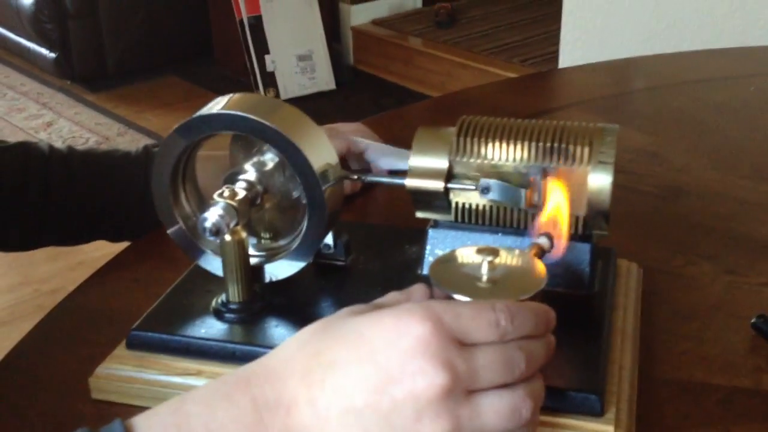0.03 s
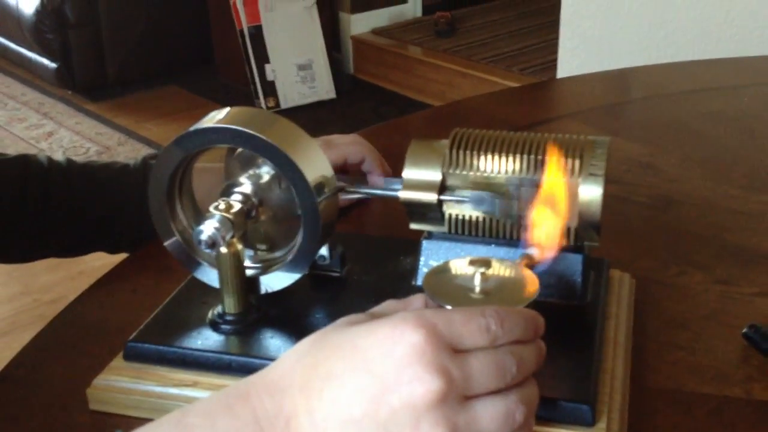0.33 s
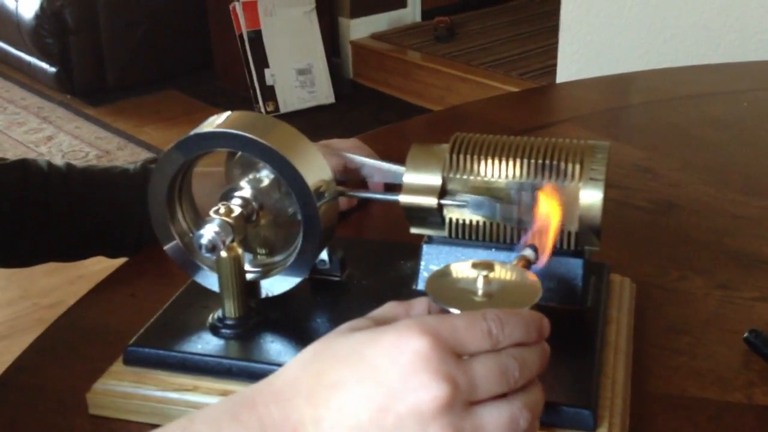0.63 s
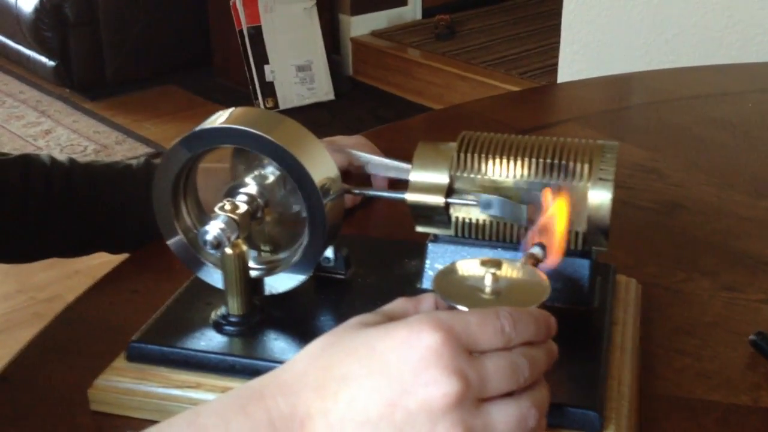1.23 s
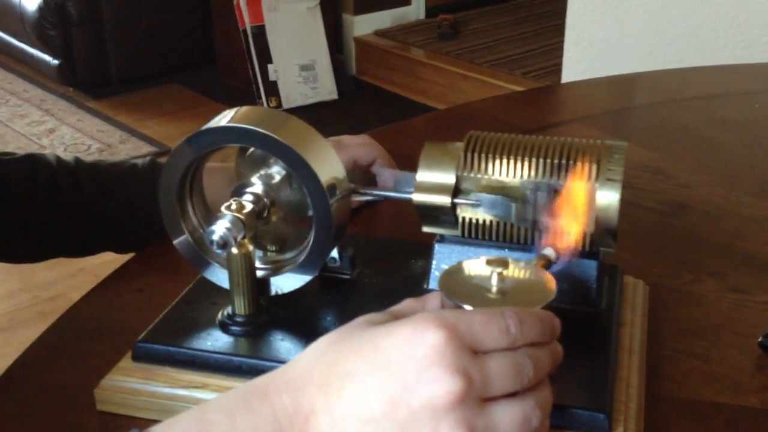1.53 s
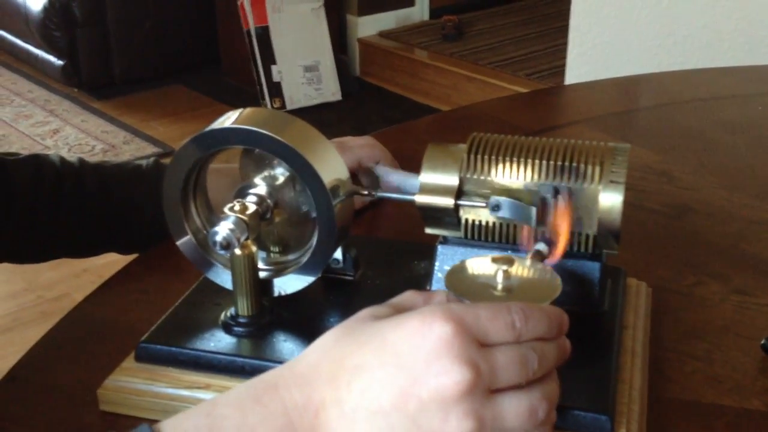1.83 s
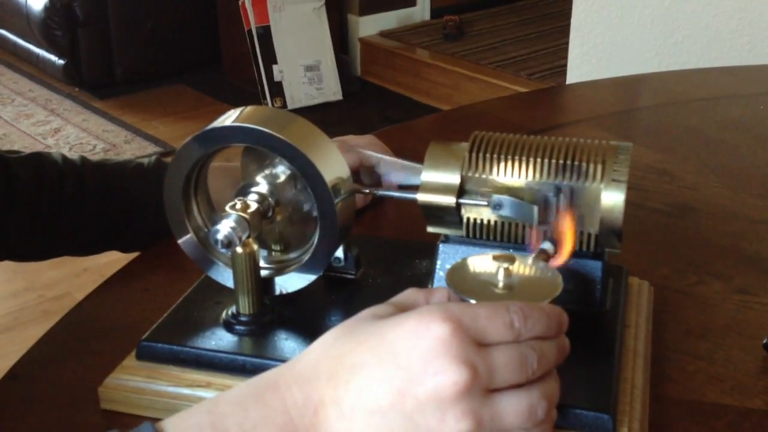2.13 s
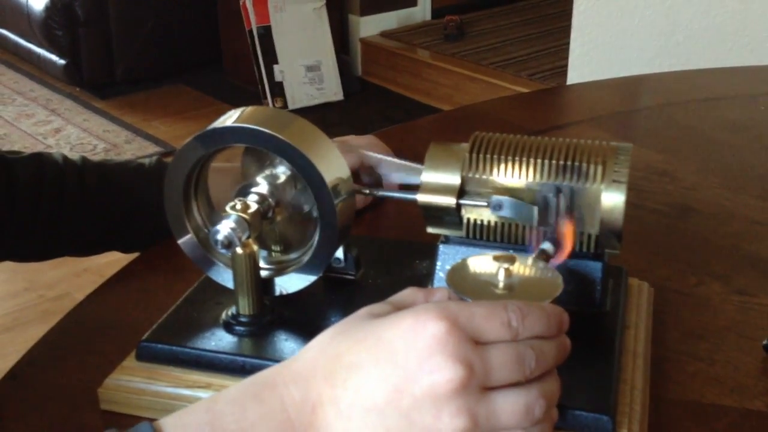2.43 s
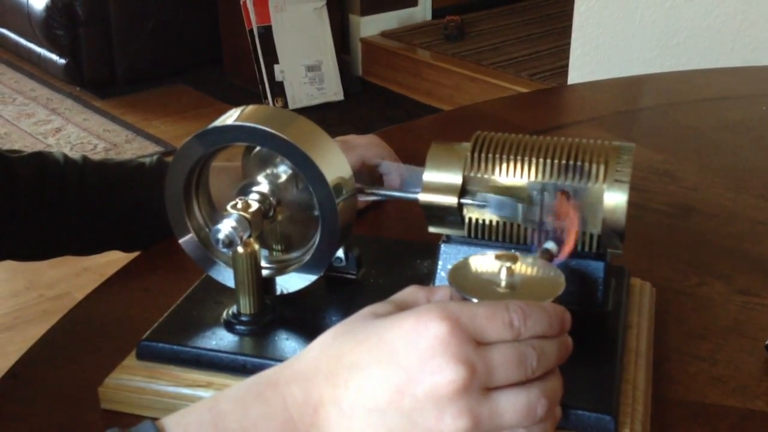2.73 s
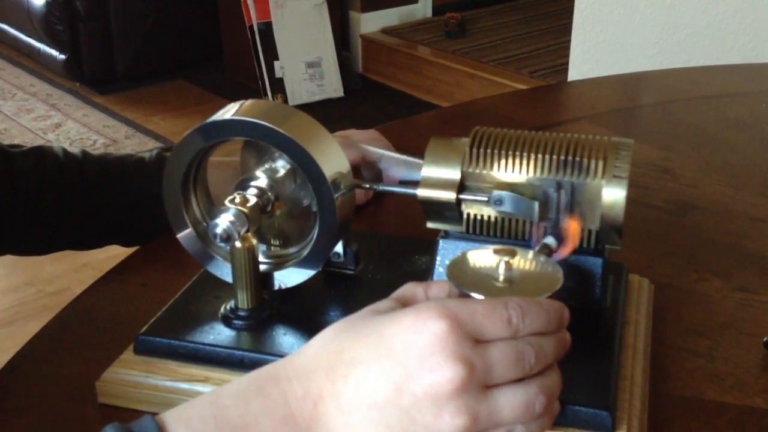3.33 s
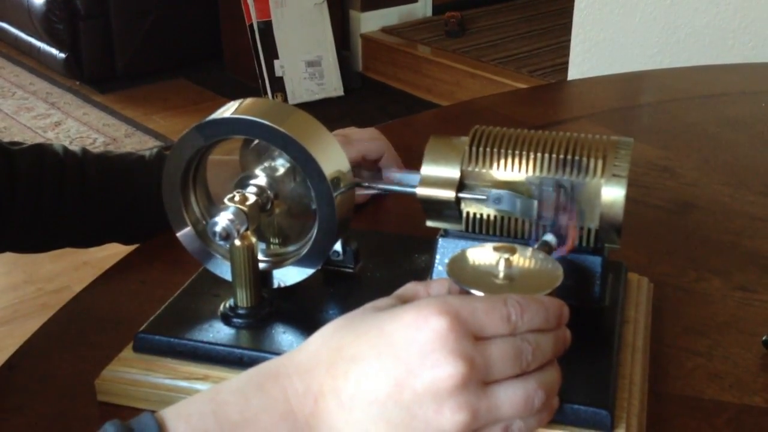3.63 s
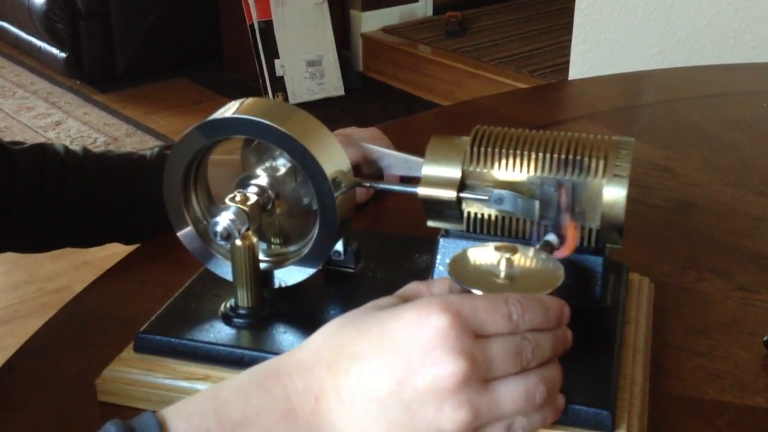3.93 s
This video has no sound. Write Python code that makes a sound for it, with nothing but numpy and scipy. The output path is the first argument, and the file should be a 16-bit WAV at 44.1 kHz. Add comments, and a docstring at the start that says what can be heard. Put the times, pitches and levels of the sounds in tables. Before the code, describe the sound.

A little flame-driven engine runs with quick popping clacks and faint ticks, gaining speed.

```python
"""Indoors, on a wooden table, a small flame-licker engine runs and picks up speed.
Once a turn its valve opens on the vacuum in the cylinder: air pops in with a puff of hiss, and the
cavity rings, rising in pitch as the port widens. Between the pops the loose linkage ticks and the
piston slides. The table and the room answer with echoes, low resonances and a short reverberation."""
import sys
import numpy as np
from scipy import signal
from scipy.fft import rfft, irfft
from scipy.io import wavfile
from scipy.ndimage import uniform_filter1d

SR = 44100
rng = np.random.default_rng(int(sys.argv[2]) if len(sys.argv) > 2 else 0)


def int16_out(signal):
    """Quantize to a 16-bit WAV file."""
    q = np.round(np.clip(np.atleast_2d(signal).T, -1, 1) * 32767)
    wavfile.write(sys.argv[1], SR, q.astype(np.int16))


N = 176400

# Reflections from near surfaces. Each row: delay in seconds, gain.
REFLECTIONS = [(.0036, 0.2), (.00735, 0.2), (.00812, -0.18), (.0093, -0.083), (.01073, .23),
               (.01379, 0.098), (0.0173, -0.053), (0.0203, -0.019), (.022, 0.059), (.0266, -0.053)]
# Modes of table and room. Each row: frequency in Hz, bandwidth in Hz, gain in dB.
LOW_MODES = [(139, 2.3, -1), (164.3, 7.7, 5), (288.2, 9.7, -3.5), (361.4, 5.7, -4.5), (439.7, 5.5, -6),
             (557.3, 11.7, -2.5), (666, 9.1, -36), (846, 10.4, -2.5), (920, 6, -29), (1110, 20, -19),
             (1163, 22, -12)]
# Spectrum of the diffuse field. Each row: frequency in Hz, gain in dB.
REVERB_SPECTRUM = [(100, 2.5), (250, -12.5), (420, -8.5), (600, -8.5), (740, -10), (1000, -16),
                   (1400, -10.5), (2200, -7), (4000, -17.5), (5500, -9.5), (8000, -6.5), (15000, -6.5)]
# Reverberation time. Each row: frequency in Hz, seconds to fall 60 dB.
REVERB_T60 = [(150, 0.34), (1500, 0.46), (6000, 0.27), (15000, 0.17)]
# Friction of the piston. Each row: frequency in Hz, relative level in dB.
PISTON_SPECTRUM = [(30, -22), (70, -20), (110, -23), (160, -10), (300, -6), (500, -9), (900, -10.5),
                   (1400, -7), (2000, -6), (2550, -7.5), (2800, -12), (4300, -17.5), (5100, -25.5),
                   (6300, -31.5), (7300, -22), (10000, -31), (14000, -25.5), (15500, -55)]
# Rub of the loose bearing. Each row: frequency in Hz, relative level in dB.
BEARING_SPECTRUM = [(100, -28), (300, -14), (900, -15), (1450, 0.5), (2000, -6.5), (2250, -0.5), (2550, 3),
                    (2800, -9.5), (3150, -0.5), (4300, -13.5), (5200, -29.5), (7300, -23), (8800, -20),
                    (15000, -32.5)]
# Contacts within a turn. Each row: part, position as a share of the turn, lag in seconds,
# level in dB when slow, level in dB when fast, scrape decay time in seconds.
TURN_CONTACTS = [ ("valve", -.044, 0, -33.5, -28, 0.0036), ("rod", 0, -.0003, -28.5, -26, 0.00022),
                 ("valve", 0.016, 0, -44, -33, 0.0012), ("rod", .30, .0042, -21.5, -25, .0001),
                 ("rod", .30, .0062, -34, -30, .0002), ("bearing", .465, 0, -41, -26.5, 0.0062),
                 ("valve", .515, 0, -30, -33, .0015), ("bearing", .565, 0, -42, -29.5, 0.0056),
                 ("bearing", 0.098, 0, -44.5, -27.5, 0.005)]
# Modes of each metal part. Each row: frequency in Hz, relative level in dB, seconds to fall 60 dB.
PART_MODES = { "rod": [(1915, -7, 0.013), (2510, -7, 0.021), (3216, -2, 0.011), (3755, -1.5, 0.0089),
              (4166, -1.5, 0.0097), (4310, -8.5, 0.007), (7270, -14, 0.0089), (7400, -37, 0.0078)],
              "valve": [(7110, -8.5, 0.018), (7800, -27, 0.0074), (8960, -15, 0.024), (13200, -10, 0.0067),
              (13720, -1.5, 0.0092), (14100, -1, 0.01)]}
# Pitch scatter from tap to tap. Each entry: part, standard deviation as a share of the pitch.
PART_DETUNE = {"rod": 0.024, "valve": 0.026}
# Flywheel turns. Each row: start in seconds, then relative levels in dB of the pop,
# the first cavity ring, the open-port whistle and the hiss.
TURNS = [(0.0007, -20.5, -24.5, -27, -38), (0.1189, -18, -22, -29, -41.5),
         (0.2395, -17, -21.5, -19.5, -38.5), (0.3622, -16, -23.5, -22, -38.5),
         (0.4859, -15.5, -24.5, -20, -35.5), (0.6125, -13.5, -25, -18.5, -31),
         (0.7406, -11, -12, -22.5, -31), (0.8652, -11.5, -12, -21.5, -33.5), (0.9886, -11.0, -10, -21, -32),
         (1.1077, -11.5, -13.5, -27, -34), (1.2262, -10.5, -9, -25, -32), (1.3416, -11, -11, -27, -32),
         (1.4545, -11, -10.5, -18.5, -30.5), (1.5658, -10.5, -13, -24, -31),
         (1.6754, -12, -15.5, -30, -29.6), (1.7844, -11, -13, -23.5, -34),
         (1.891, -10.5, -13.5, -28, -33.5), (1.9955, -12.0, -9.5, -27, -34),
         (2.0973, -10.5, -10, -35, -35.5), (2.1974, -11.9, -13, -30, -36), (2.296, -12, -14, -34, -32.5),
         (2.3935, -11.5, -13.5, -32, -31.5), (2.4897, -11.5, -13.5, -30, -34.3),
         (2.585, -13, -15.5, -25.8, -34.5), (2.679, -13.5, -23, -18.5, -34),
         (2.7725, -11.5, -17.8, -22.5, -33), (2.8646, -13, -16.5, -24, -30.5),
         (2.9567, -12.5, -16, -27, -34.6), (3.047, -13.5, -21.5, -21.5, -32.5),
         (3.137, -11.6, -17, -36, -31.5), (3.2257, -11, -15, -39, -31), (3.3139, -12, -17, -24, -32),
         (3.4013, -11.5, -14, -30, -31.5), (3.4869, -11.5, -17, -17.5, -30.5),
         (3.573, -12, -19.9, -19, -33.5), (3.6575, -12, -18, -17.5, -33.5), (3.7413, -12, -18, -17, -35.5),
         (3.8241, -12, -19, -20, -31), (3.9068, -11.5, -15.5, -15, -32.3), (3.988, -10.9, -20, -17, -35)]
# Cavity pitch as the port opens and shuts. Each row: share of the turn, frequency in Hz.
CAVITY_GLIDE = [(0, 1251), (.016, 1378), (.028, 1902), (.055, 1938), (.08, 1600)]
# Air rushing through the port. Each row: frequency in Hz, relative level in dB.
HISS_SPECTRUM = [(1500, -11), (2000, -1), (2400, 7.5), (2800, -1.5), (3700, -0.5), (5200, -14), (6300, -18),
                 (7400, -2.5), (8500, -9.5), (10000, -15), (12600, -9.5), (14200, -7.5), (15500, -18)]
# The valve leaks once, just before opening. Each row: time in seconds, relative level in dB.
VALVE_LEAKS = [(0.3611, -24)]
# Modes of the cylinder. Each row: frequency in Hz, bandwidth in Hz, gain in dB.
CYLINDER_MODES = [(1838, 40, -13.5), (2030, 47, -13), (2390, 64, -5.5)]

SLOW_HZ, FAST_HZ = 7.36, 11.83  # turning rates at pace 0 and pace 1
CONTACT_RISE_S, SUCTION_S = 0.00035, 0.00029


def amp(db):
    """Amplitude grows tenfold for every 20 dB."""
    return 10 ** (np.asarray(db) / 20)


def unit(x):
    """Normalisation brings a signal to rms 1."""
    return x / np.sqrt(np.mean(x ** 2) + 1e-20)


def read(points, hz):
    """Interpolation reads a table along a log-frequency axis."""
    f, value = np.transpose(points)
    return np.interp(np.log(hz + 1), np.log(f + 1), value)


def add(mix, start_s, sound):
    """Superposition: a sound adds to the mix from its start time on."""
    at = round(start_s * SR)
    sound = sound[max(-at, 0):]
    part = mix[max(at, 0):][:len(sound)]
    part += sound[:len(part)]


def noise(spectrum, size):
    """Filtering gives white noise a spectrum, here at rms 1."""
    gain = amp(read(spectrum, np.fft.rfftfreq(size, 1 / SR)))
    return unit(irfft(rfft(rng.standard_normal(size)) * gain, size))


def burst(spectrum, rise_s, fall_s):
    """A noise transient rises linearly and decays exponentially."""
    t = np.arange(2048) / SR
    envelope = np.minimum(t / rise_s, 1) * np.exp(-np.maximum(t - rise_s, 0) / fall_s)
    return noise(spectrum, len(t)) * envelope


def resonate(x, hz, width_hz):
    """A resonator passes a band around its natural frequency, with peak gain 1."""
    return signal.lfilter(*signal.iirpeak(hz, hz / width_hz, fs=SR), x)


def flywheel():
    """Rate is the inverse of period: gives each turn's start, period and pace (0 slow, 1 fast)."""
    starts = np.array(TURNS)[:, 0]
    periods = np.append(np.diff(starts), starts[-1] - starts[-2])
    return starts, periods, (1 / periods - SLOW_HZ) / (FAST_HZ - SLOW_HZ)


def room(x, echo_cutoff_hz=2040, mode_lag_s=0.01037, onset_s=0.0067):
    """Reflection and resonance: near echoes, low modes of table and room, and a diffuse tail."""
    out = np.zeros(N)
    dull = signal.lfilter(*signal.butter(1, echo_cutoff_hz, fs=SR), x)
    for delay, gain in REFLECTIONS:
        add(out, delay, gain * dull)
    for hz, width, db in LOW_MODES:
        add(out, mode_lag_s, amp(db) * resonate(x, hz, width))
    hz, t, bands = signal.stft(rng.standard_normal(SR // 2), SR, nperseg=256)
    decay = amp(-60 * t / read(REVERB_T60, hz)[:, None]) * np.minimum(t / onset_s, 1) ** 2
    decay /= np.sqrt(np.mean(decay ** 2, axis=1, keepdims=True) * SR / 2)  # equal energy per band
    tail = signal.istft(bands * decay * amp(read(REVERB_SPECTRUM, hz))[:, None], SR)[1]
    return out + signal.fftconvolve(x, tail)[:N]


def piston(slow_db=-46, fast_db=-37.5, stroke_db=1.5, peak_turn=0.36):
    """Sliding friction makes noise that swells once a turn and grows with speed."""
    starts, _, paces = flywheel()
    t = np.arange(N) / SR
    crank_turns = np.interp(t, starts, np.arange(len(starts)))
    level_db = slow_db + (fast_db - slow_db) * np.interp(t, starts, paces)
    level_db += stroke_db * np.cos(2 * np.pi * (crank_turns - peak_turn))
    return noise(PISTON_SPECTRUM, N) * amp(level_db)


def clink(modes, detune, scrape_s, scrape_gain=0.13):
    """An impulse with a short scrape excites the damped modes of a metal part."""
    t = np.arange(2048) / SR
    force = (t == 0) + scrape_gain * rng.standard_normal(len(t)) * np.exp(-t / scrape_s)
    pitch = 1 + detune * rng.standard_normal()
    ring = sum(amp(db - 60 * t / t60) * np.sin(2 * np.pi * hz * pitch * t) for hz, db, t60 in modes)
    ring *= 1 - np.exp(-t / CONTACT_RISE_S)
    return signal.fftconvolve(force / np.linalg.norm(force), ring)


def linkage(jitter_s=0.0004, spread_db=0.26):
    """Impact and friction: loose parts touch at set crank angles, most of them harder with speed."""
    out = np.zeros(N)
    for start, period, pace in zip(*flywheel()):
        for part, share, lag, slow_db, fast_db, scrape_s in TURN_CONTACTS:
            contact_s = start + share * period + lag + jitter_s * rng.standard_normal()
            level_db = slow_db + (fast_db - slow_db) * pace + spread_db * rng.standard_normal()
            if part == "bearing":
                sound = burst(BEARING_SPECTRUM, CONTACT_RISE_S, scrape_s)
            else:
                sound = clink(PART_MODES[part], PART_DETUNE[part], scrape_s)
            add(out, contact_s, amp(level_db) * sound)
    return out


def cylinder(air):
    """Resonance keeps the cylinder singing after each inrush."""
    return sum(amp(db) * resonate(air, hz, width) for hz, width, db in CYLINDER_MODES)


def cavity(t, period, pace, ring_db, whistle_db, decay_s=0.0017, detune=0.027, flutter_s=0.00039):
    """Cavity resonance rises in pitch as the port widens; the pitch flutters more at speed."""
    turn, open_s = t / period, np.maximum(t, 0)
    flutter = unit(uniform_filter1d(rng.standard_normal(len(t)), round(flutter_s * SR)))
    flutter *= 0.043 + 0.097 * pace ** 2
    hz = np.interp(turn, *np.transpose(CAVITY_GLIDE)) * (1 + detune * rng.standard_normal() + flutter)
    phase = 2 * np.pi * np.cumsum(hz * (t > 0)) / SR
    ring = amp(ring_db) * np.minimum(open_s / (2 * SUCTION_S), 1) * np.exp(-open_s / decay_s)
    whistle = amp(whistle_db) * np.exp(-((turn - 0.053) / 0.022) ** 2) * (t > 0)  # port wide open
    return -(ring + whistle) * np.cos(phase)


def pop(t, width_s, swell_scale=1, crack_depth=0, swell_s=0.00077, rebound_s=0.0043):
    """A rarefaction pulse: pressure builds, snaps into suction and rebounds gently."""
    crack = crack_depth * np.exp(-((t + 0.0021) / 0.0005) ** 2)  # the valve cracks open early
    swell = 0.35 * swell_scale * np.exp(np.minimum(t, 0) / swell_s)
    swell *= (1 - np.tanh((t + width_s) / (width_s / 2))) / 2  # ends as suction begins
    suction = np.exp(-(t / width_s) ** 2)
    rebound = 0.063 * np.exp(-((t - rebound_s) / swell_s) ** 2)
    return swell - crack - suction - rebound


def inrush(pop_gain_db=7.5, ring_gain_db=8, whistle_gain_db=-1, hiss_gain_db=5.5):
    """A pressure difference drives air through the opening valve: a pop, a cavity ring and hiss."""
    out = np.zeros(N)
    t = np.arange(-200, 800) / SR  # the valve opens at t = 0
    _, periods, paces = flywheel()
    for (start, pop_db, ring_db, whistle_db, hiss_db), period, pace in zip(TURNS, periods, paces):
        tone = cavity(t, period, pace, ring_db + ring_gain_db, whistle_db + whistle_gain_db)
        width_s = SUCTION_S * np.exp(0.071 * rng.standard_normal())
        swell_scale = 1 + 0.1 * (-13 - pop_db)  # soft pops have a larger swell
        pressure = pop(t, width_s, swell_scale, crack_depth=0.01 + 0.14 * pace ** 2)
        add(out, start + t[0], amp(pop_db + pop_gain_db) * pressure + tone)
        hiss = burst(HISS_SPECTRUM, rise_s=0.00087, fall_s=0.0045)
        add(out, start, amp(hiss_db + hiss_gain_db) * hiss)
    for leak_s, db in VALVE_LEAKS:
        add(out, leak_s + t[0], amp(db + pop_gain_db) * pop(t, SUCTION_S))
    return out


def scene():
    """Superposition: the direct sound of air and linkage, the room's response, and the piston."""
    air = inrush()
    engine = air + cylinder(air) + linkage()
    return (engine + room(engine) + piston())[None]


def record(dry, low_cut_hz=128, bass_leak=0.02, ceiling=1.1, top_hz=15500):
    """A small microphone filters and saturates: bass cut, treble dip, soft overload, band limit."""
    high_pass = signal.butter(6, low_cut_hz, "high", fs=SR, output="sos")
    x = signal.sosfiltfilt(high_pass, dry, padtype=None) + bass_leak * dry
    x = x - 0.53 * resonate(x, hz=4990, width_hz=830)
    x = x / (1 + (x / ceiling) ** 4) ** (1 / 4)
    low_pass = signal.firwin(301, top_hz, window=("kaiser", 8), fs=SR)
    return signal.oaconvolve(x, low_pass[None], "same")


dry = scene()
out = record(dry)
int16_out(out)
```